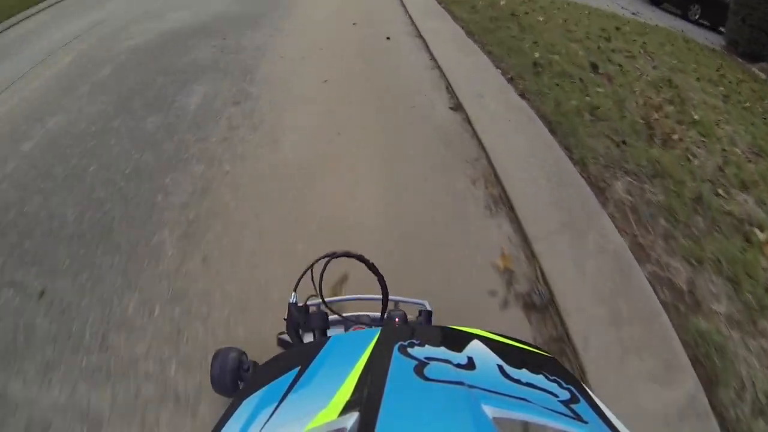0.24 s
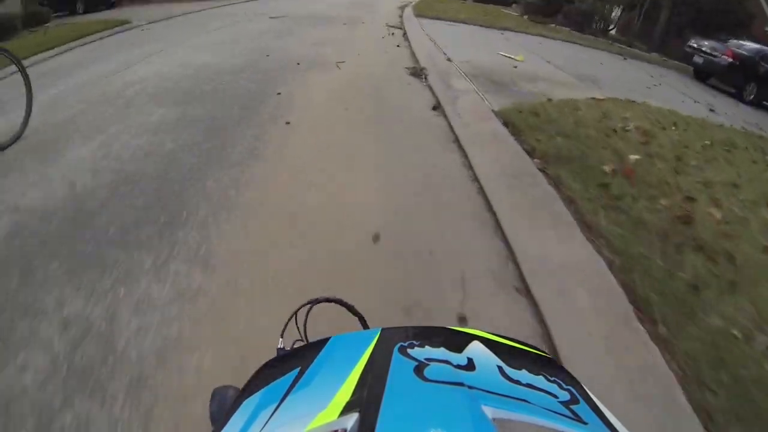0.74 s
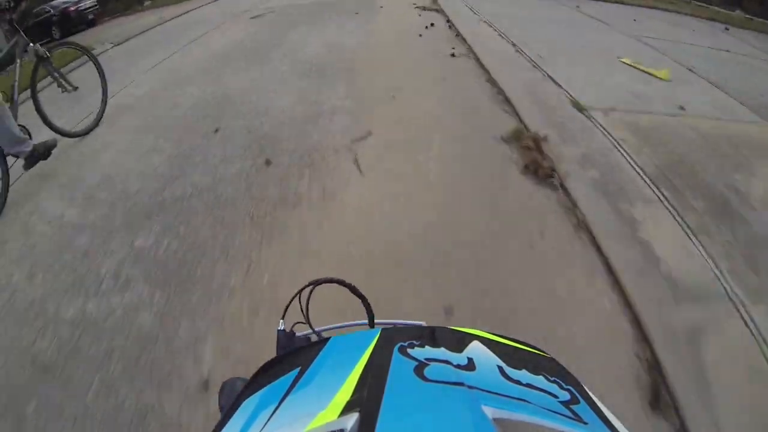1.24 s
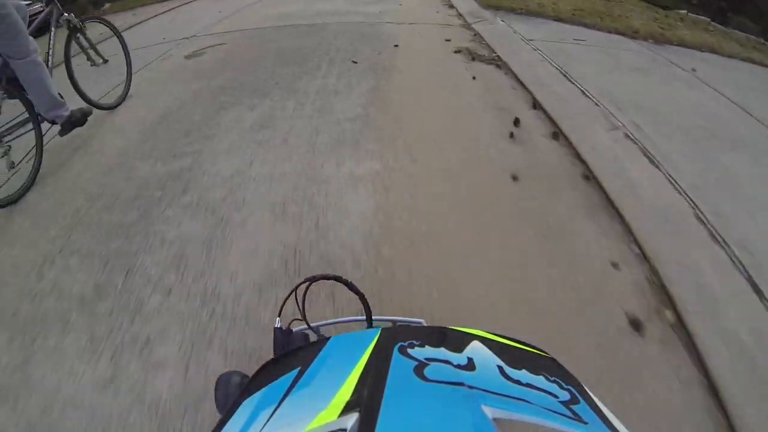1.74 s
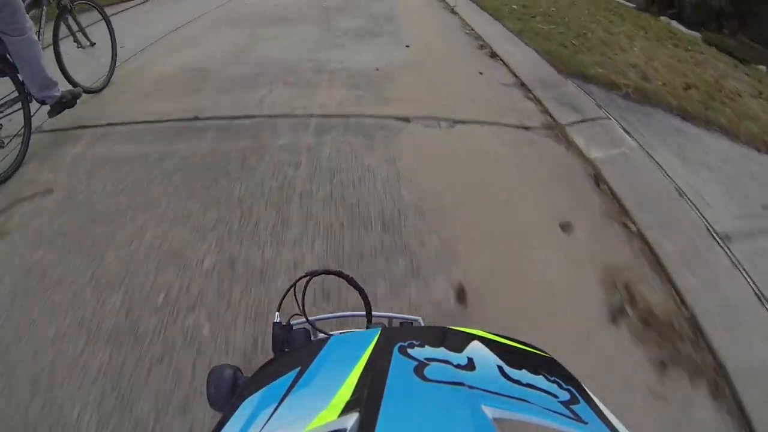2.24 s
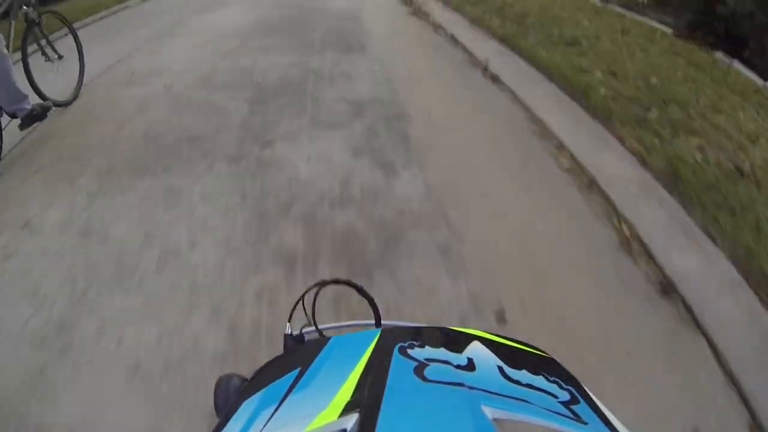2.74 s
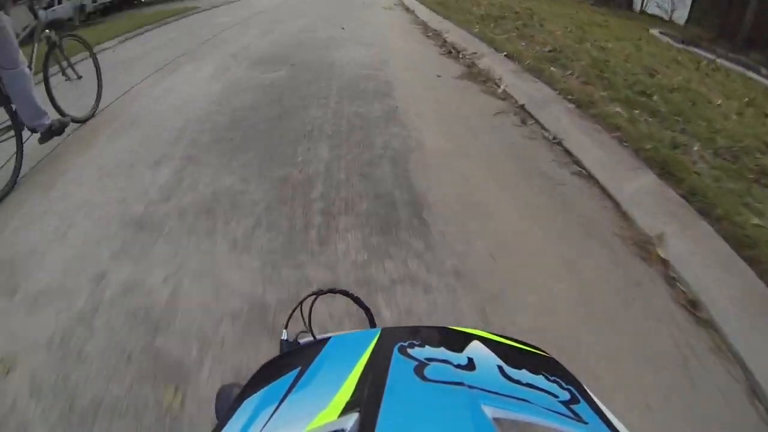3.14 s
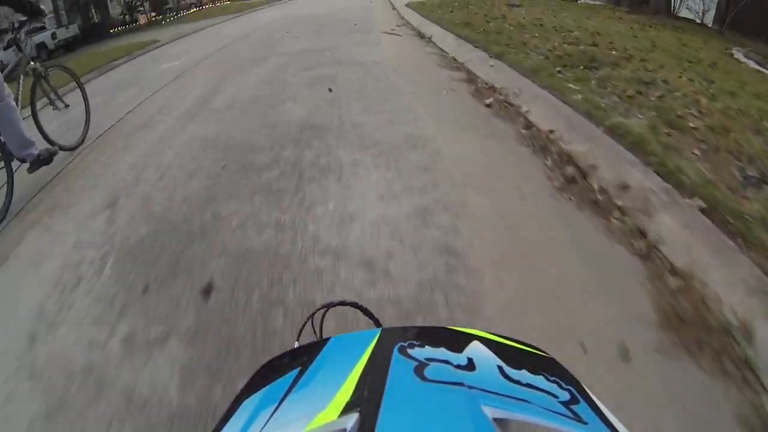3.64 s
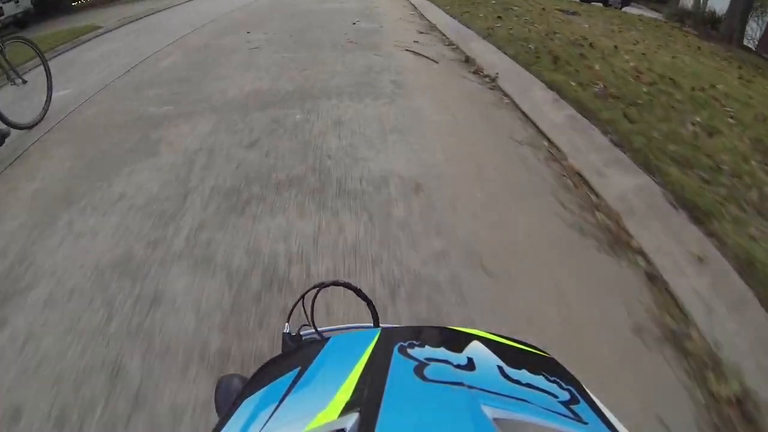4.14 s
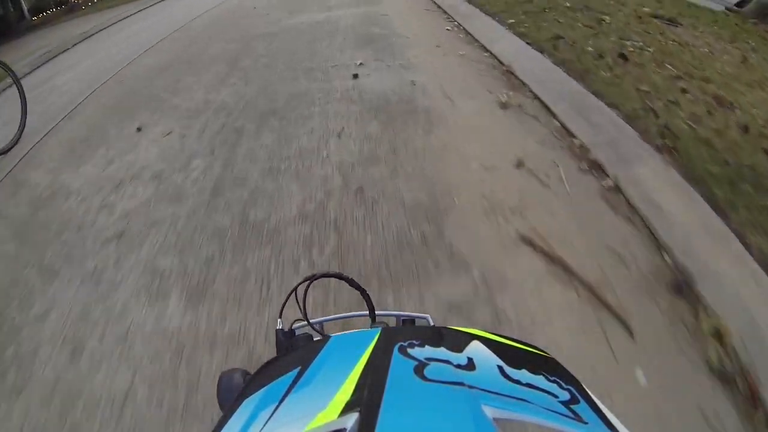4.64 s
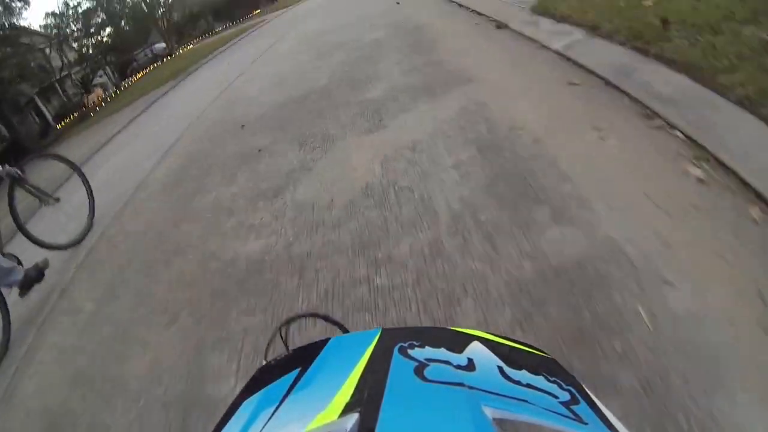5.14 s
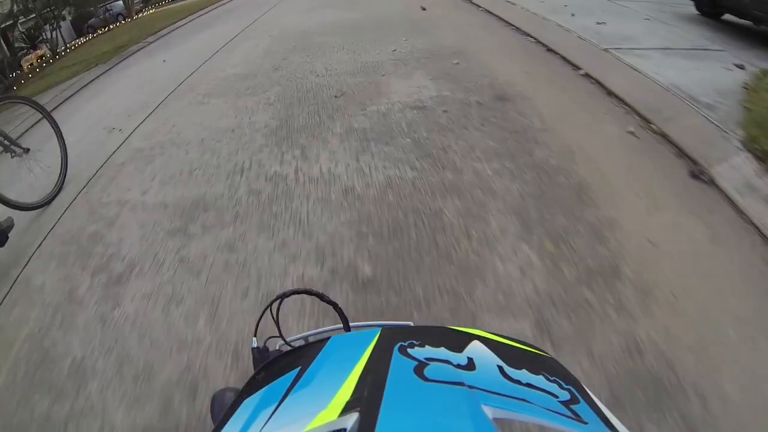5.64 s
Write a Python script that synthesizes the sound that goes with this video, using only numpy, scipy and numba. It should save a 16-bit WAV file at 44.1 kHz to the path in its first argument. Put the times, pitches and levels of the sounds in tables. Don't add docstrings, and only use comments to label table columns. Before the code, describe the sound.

A close, muffled outdoor ride in an electric kart, picked up at the driver's helmet inside a closed plastic case. A low, grainy roar from coarse concrete runs throughout, with hard plastic rattle, tiny bright latch ticks and a faint high tinkle. Heavy jolts and dull helmet thuds crowd the first 0.45 seconds. From about 0.5 a soft, nearly pure motor hum rises slightly until 1.1, when another bump hits; it resumes from 1.2 to 2.3, with a faint rougher chain note below around 1.6 to 2.2. Deep wind swells near 2.1. From 2.25 to 2.65 comes the fiercest cluster of thuds and clatter, momentarily ducking the sound. A short hum dab follows near 2.8, then a longer climb from 3.05 to 4.25 over mostly smoother road, with a wind gust around 4.2. A faint last push ends near 4.85; bumps, rattle and roar continue to the abrupt end near 5.9.

```python
import sys
import numpy as np
from scipy import signal
from scipy.fft import rfft, irfft
from scipy.io import wavfile
from scipy.ndimage import uniform_filter1d
from numba import njit

SR = 44100
rng = np.random.default_rng(int(sys.argv[2]) if len(sys.argv) > 2 else 0)


def how_loud(loudness_db):
    steps = np.asarray(loudness_db, float) / 20
    return 10 ** steps


def pcm_store(signal):
    levels = np.round(np.clip(np.atleast_2d(signal), -1, 1) * 32767)
    wavfile.write(sys.argv[1], SR, levels.astype(np.int16).T)


N = 259749


def level(x, db=0):
    return x * how_loud(db) / np.sqrt(np.mean(x ** 2))


def walk(rate_hz):
    k = int(SR / rate_hz)
    steps = np.repeat(rng.standard_normal(N // k + 1), k)
    return 1.07 * uniform_filter1d(uniform_filter1d(steps, k), k)[:N]


def colour(x, gain_db):
    size = 8192
    hz = np.arange(size // 2 + 1) * SR / size + 1
    cep = irfft(gain_db(hz) * np.log(10) / 20)
    cep[1:size // 2] *= 2
    cep[size // 2 + 1:] = 0
    return signal.fftconvolve(x, irfft(np.exp(rfft(cep))))[..., :N]


def body(modes, top_hz):
    def gain_db(hz):
        power = 0
        for f_hz, width_hz, db in modes:
            detune = (hz - f_hz * f_hz / hz) / width_hz
            power = power + how_loud(db) ** 2 / (1 + detune ** 2) ** 1.76
        return 10 * np.log10(power / (1 + (hz / top_hz) ** 8))
    return gain_db


def grit(scatter_db):
    size_db = scatter_db * np.minimum(rng.exponential(size=N), 5)
    return level(rng.standard_normal(N) * how_loud(size_db))


def resonate(push, modes, top_hz, scatter_db):
    knocks, gain_db = grit(scatter_db), body(modes, top_hz)
    return colour(push * knocks, gain_db) / np.std(colour(knocks, gain_db))


# t/s, level/dB
COARSENESS = [(0, 4), (.5, 0), (.8, -1), (1.1, -1), (1.3, 1), (1.5, 2), (2.1, 4.5), (2.2, 0.5), (2.75, 0),
              (3.2, 0), (3.31, -4), (3.4, 2.5), (3.6, -7.5), (3.8, 2.5), (4.2, 3), (4.5, -3), (5.1, 0.5),
              (5.89, -1)]
# t/s, length/s, rattle rise/dB, roar rise/dB
ROUGH_PATCHES = [(0.042, 0.078, 8.5, 4.5), (0.161, 0.086, 10.5, 7), (0.341, .1, 12.5, 5.5),
                 (1.116, 0.11, 10, 7), (2.247, 0.084, 1.5, 2.5), (2.334, .04, 9, 3),
                 (2.424, 0.061, 11, 0.5), (2.497, 0.036, 13.5, 5.5), (2.597, 0.0084, 10, 1.5),
                 (2.644, 0.037, 11, 3.5), (2.899, 0.11, 4, 2.5), (3.016, 0.016, 5.5, -0.5),
                 (3.259, 0.036, 2, 5.5), (3.407, 0.058, -2.5, 0), (3.775, 0.1, -1.5, -0.5),
                 (4.328, 0.044, 5, 3), (4.573, 0.024, 7, 5), (4.657, 0.018, 6, 5.5), (4.807, .03, 4.5, 2),
                 (4.877, 0.061, 5.5, 2), (4.977, 0.01, 15, 6), (5.045, 0.025, 10.5, 4.5),
                 (5.16, 0.045, 9.5, 3.5), (5.324, 0.074, 5.5, -0.5), (5.456, 0.0257, 4.5, 3),
                 (5.63, 0.057, 6.5, 0), (5.766, 0.041, 6.5, 1), (5.865, 0.052, 11, 5)]


def road():
    plain_roar_db, plain_rattle_db, plain_tick_db = -14.5, -32.5, -63.5
    rise_s, fall_s = 0.0098, 0.014
    t = np.arange(N) / SR
    coarse_db = np.interp(t, *np.transpose(COARSENESS))
    roar_db = plain_roar_db + 0.54 * coarse_db
    rattle_db = plain_rattle_db + coarse_db
    for s, length_s, rattle_up_db, roar_up_db in ROUGH_PATCHES:
        shape = np.interp(t, [s - rise_s, s, s + length_s, s + length_s + fall_s], [0, 1, 1, 0])
        roar_db = roar_db + roar_up_db * shape
        rattle_db = rattle_db + rattle_up_db * shape
    tick_db = plain_tick_db + 0.946 * (rattle_db - plain_rattle_db)
    return roar_db, rattle_db, tick_db


def bursts(times_s, peaks_db, decay_s):
    rise_s = 0.0019
    out, u = np.zeros(N + 6000), np.arange(6000) / SR
    shape = np.exp(-u / decay_s) * (1 - np.exp(-u / rise_s))
    for s, gain in zip(times_s, how_loud(peaks_db)):
        out[int(s * SR):][:6000] += (gain * shape) ** 2
    return out[:N]


# t/s, rattle peak/dB, roar re rattle/dB, knock re rattle/dB
CASE_JOLTS = [(.038, -0.5, 2, -6), (0.0825, -1.5, -1.5, -8.5), (.163, -16.5, -3, -4.5),
              (0.215, -0.5, -0.5, -2), (.356, -3.5, -3, -2), (0.419, -2.5, 6.5, -24),
              (0.6447, -9.5, -2.5, -5), (1.04, -12.5, 12.5, -5), (1.104, -8, -1.5, -7.5),
              (1.1648, -1.5, 2.5, -16.5), (1.615, -16, -13, -9), (1.8986, -8.5, 8, -8),
              (2.112, -11, 12, -9), (2.27, 0, 6, -4), (2.3411, -6.5, 10.5, -12), (2.376, -4.5, 1.5, -12),
              (2.4294, -5, 2.5, -4), (2.646, -13.5, 21.5, -13), (2.9095, -9.5, -0.5, -8),
              (3.0122, -15.5, -1, -5), (3.8427, -21, 12, -3), (4.65, -16, 1, 5.5), (4.8238, -10, -4, -2.5),
              (4.963, -11, -3, -8), (5.044, -6, -2, -3), (5.148, -10, -5, -4), (5.1844, -12, 0, -11),
              (5.46, -14, 13, 5.5), (5.672, -8.5, -8, -7), (5.778, -8, -3, -4)]
SMALL_BUMPS = [.717, .92, 1.314, 1.453, 1.986, 2.584, 2.839, 3.174, 3.25, 3.385, 3.621, 3.746, 3.914, 4.334,
               4.691, 4.78, 5.294, 5.576, 5.619, 5.876]
# t/s, peak level/dB
LATCH_TICKS = [(.0538, -38.5), (0.3476, -35.5), (.6779, -43), (0.874, -41.5), (1.274, -50), (1.428, -40),
               (1.567, -47.5), (1.658, -45.5), (1.808, -40), (1.978, -39), (2.248, -34.5), (2.485, -31.5),
               (2.842, -42), (3.0774, -39.5), (3.248, -39.5), (3.381, -46), (3.5274, -45), (3.6287, -42.5),
               (3.7454, -45), (3.9025, -42.5), (4.2632, -50), (4.419, -41), (4.4548, -38), (4.4923, -42),
               (4.529, -48), (4.569, -44.5), (4.9046, -34), (5.358, -44), (5.61, -43.5), (5.87, -37.5)]


def jolt_powers():
    small = [(s, -20, 16.5, -3) for s in SMALL_BUMPS]
    s, db, roar_re_db, knock_re_db = np.transpose(np.vstack([CASE_JOLTS, small]))
    jolt_s, clack_s, knock_s = 0.013, 0.0072, 0.002
    knock = how_loud(5) * bursts(s, db + knock_re_db, knock_s)
    frame_power = bursts(s, db + roar_re_db - 6.5, 0.64 * jolt_s) + how_loud(5.5) * knock
    case_power = bursts(s, db - 10.5, jolt_s) + knock
    tick_s, tick_peak_db = np.hstack([np.transpose(LATCH_TICKS), [s, db - 31]])
    latch_power = bursts(tick_s, tick_peak_db - 10, clack_s)
    return frame_power, case_power, latch_power, how_loud(-23.5) * latch_power


# f/Hz, width/Hz, level/dB
FRAME_MODES = [
    (146.6, 42, -6),
    (229, 62.6, -2.5),
    (297, 35, -2.5),
    (330.7, 100, -2),
    (411.6, 66, -3),
    (487, 85, -3),
    (546, 49, -4),
    (639, 240, -10),
    (848, 99, -7.5),
    (955, 173, -16),
]


def frame(push):
    return resonate(push, FRAME_MODES, 1960, 2.73)


# f/Hz, width/Hz, level/dB
CASE_MODES = [
    (1079, 340, 3.5),
    (1574, 254, 4),
    (1912, 360, 2.5),
    (2510, 340, -10.5),
    (2952, 250, -9),
    (3270, 430, -11.5),
    (3720, 480, -16.5),
    (4877, 820, -22),
    (6360, 660, -29),
]


def case(push):
    return resonate(push, CASE_MODES, 6550, 3.2)


# f/Hz, width/Hz, level/dB
LATCH_MODES = [
    (8370, 690, 5),
    (9550, 1400, -4),
    (10450, 690, -2),
    (11200, 670, -2.5),
    (12500, 900, -5.5),
    (13250, 500, -17),
    (13900, 500, -19),
]


def latch(push):
    return resonate(push, LATCH_MODES, 13800, 3.0)


# f/Hz, width/Hz, level/dB
PIN_MODES = [
    (11200, 400, -2),
    (13250, 200, 8),
    (13900, 400, -13),
]


def pin(push):
    return resonate(push, PIN_MODES, 14000, 3.5)


def shaking(roar_db, rattle_db, tick_db):
    tremble = 0.15 * walk(18) + walk(60)
    roar = how_loud(roar_db - 2.15 + 0.12 * tremble)
    rattle = (how_loud(rattle_db - 2.5) + how_loud(-38)) * how_loud(1.8 * tremble)
    ticking = how_loud(tick_db - 1.5 + 1.5 * tremble + 1.7 * walk(90))
    tinkle = how_loud(tick_db - 14.5 + 2.2 * tremble + 3.4 * walk(110) + 3.5 * walk(9))
    steady = np.array([roar, rattle, ticking, tinkle])
    frame_push, case_push, latch_push, pin_push = np.sqrt(steady ** 2 + np.array(jolt_powers()))
    return frame(frame_push) + case(case_push) + latch(latch_push) + pin(pin_push)


# f/Hz, level/dB per Hz
WIND_SPECTRUM = [
    (8.8, -28),
    (15, -1),
    (34, 1.5),
    (102, -10),
    (130, -13.5),
    (170, -38.5),
    (290, -120),
]
# t/s, level/dB
GUST_LEVELS = [(0, -23), (.4, -27), (.7, -25), (1.05, -21.5), (1.2, -19.5), (1.6, -18.5), (2.1, -15.5),
               (2.4, -20), (2.7, -28), (3.0, -23), (3.401, -19), (3.7, -24), (4.2, -16), (4.4, -23),
               (4.7, -20.5), (5.1, -26), (5.5, -23), (5.89, -20.5)]


def wind():
    gust_db = np.interp(np.arange(N) / SR, *np.transpose(GUST_LEVELS))
    hz, per_hz_db = np.transpose(WIND_SPECTRUM)
    swirl = colour(rng.standard_normal(N), lambda f: np.interp(np.log(f), np.log(hz), per_hz_db))
    return level(swirl) * how_loud(gust_db + 1.4 * walk(14))


# t/s, peak level/dB, f/Hz, t60/s
HELMET_BLOWS = [(0.037, 3.5, 323, .08), (.099, 3, 281, 0.074), (0.216, 3.5, 299, .15),
                (.359, -6.5, 434, 0.098), (0.426, 3, 368, 0.08), (1.108, -1.5, 305.5, 0.22),
                (1.159, -3.5, 311, 0.11), (1.618, -2, 304, 0.077), (2.27, 2.5, 308, .08),
                (2.346, 6.5, 544, .07), (2.428, 0.5, 458, 0.12), (2.514, 14.5, 351, 0.056),
                (2.583, 2.5, 534, .06), (2.648, 11, 298, 0.062), (2.839, -10, 436, .09),
                (2.919, -3, 229, 0.11), (3.64, -4, 291.5, 0.17), (4.081, -2, 540, 0.12),
                (4.198, 5, 328, .085), (4.332, -4, 351, .07), (4.818, 0.5, 286, 0.1),
                (4.899, 2.5, 301, .07), (5.045, -6, 205, 0.17), (5.178, -13, 273, .09),
                (5.454, 5.5, 274, .045), (5.7, 0, 556, 0.081)]


def thuds():
    rise_s = 0.0063
    out, u = np.zeros(N + 9000), np.arange(9000) / SR
    for s, db, hz, t60_s in HELMET_BLOWS:
        ring = np.sin(2 * np.pi * (hz * u + rng.random()))
        ring *= np.exp(-np.log(1000) * u / t60_s) * (1 - np.exp(-u / rise_s))
        out[int(s * SR):][:9000] += how_loud(db - 3) * ring
    return out[:N]


def tone(pushes, waver, octave_db):
    t, hz, gain = np.arange(N) / SR, np.full(N, 400.), np.zeros(N)
    for push in pushes:
        s, f_hz, db = np.transpose(push)
        on = (t >= s[0]) & (t < s[-1])
        hz[on] = np.interp(t[on], s, f_hz)
        gain[on] = how_loud(np.interp(t[on], s, db))
    gain = uniform_filter1d(gain, size=600) * how_loud(1.2 * walk(18) + 1.2)
    phase = 2 * np.pi * np.cumsum(hz * (1 + waver * walk(25))) / SR
    return np.sqrt(2) * gain * (np.sin(phase) + how_loud(octave_db) * np.sin(2 * phase))


# t/s, f/Hz, level/dB
PEDAL_PUSHES = [
    [(.52, 358, -25.5), (.59, 370, -15.5), (.72, 382, -20.5), (.92, 389, -18), (1.09, 397, -18.5),
     (1.11, 397, -34)],
    [(1.21, 402, -16.5), (1.35, 415, -14.5), (1.55, 422, -19.5), (1.7, 425, -22.5), (2.0, 427, -20),
     (2.28, 430, -30)],
    [(2.72, 415, -31.5), (2.82, 432, -21), (2.95, 445, -38)],
    [(3.05, 416, -18), (3.2, 423, -20), (3.4, 435, -23.5), (3.7, 450, -26), (4.0, 460, -21.5),
     (4.25, 457, -30)],
    [(4.42, 455, -26), (4.6, 452, -28.5), (4.72, 468, -24.5), (4.84, 474, -29)],
]


def motor():
    return tone(PEDAL_PUSHES, 0.002, -20)


# t/s, f/Hz, level/dB
CHAIN_NOTE = [
    (1.58, 288.3, -30),
    (1.66, 297, -24),
    (1.9, 298, -23),
    (2.1, 306, -25),
    (2.22, 316, -37.5),
]


def chain():
    return tone([CHAIN_NOTE], 0.005, -24)


def scene():
    return (shaking(*road()) + wind() + thuds() + motor() + chain())[None]


@njit
def follow(x, rise, fall, start):
    out, e = np.empty(len(x)), start
    for i in range(len(x)):
        a = abs(x[i])
        e += (a - e) * (rise if a > e else fall)
        out[i] = e
    return out


def roll_off(x):
    return signal.sosfilt(signal.butter(12, 15010, fs=SR, output="sos"), x)


def record(dry):
    grab_s, let_go_s, hold_db, ratio = 0.006, 0.2, -10, 15
    full_scale, makeup_db = 1.01, 1.0
    loud = follow(dry[0], 1 / (grab_s * SR), 1 / (let_go_s * SR), 0.55)
    duck = np.minimum(how_loud(hold_db) / loud, 1) ** (1 - 1 / ratio)
    mix = dry * duck * how_loud(makeup_db)
    mix = mix / (1 + np.abs(mix / full_scale) ** 6) ** (1 / 6)
    return roll_off(mix)


dry = scene()
out = record(dry)
pcm_store(out)
```